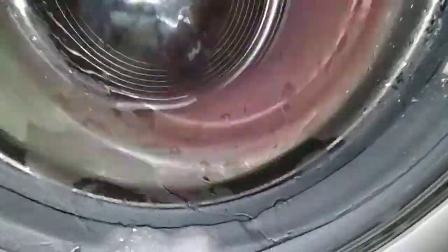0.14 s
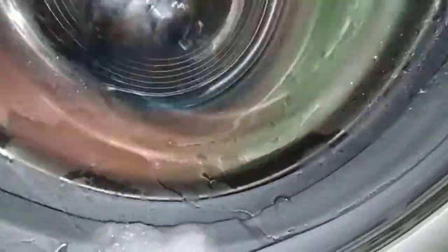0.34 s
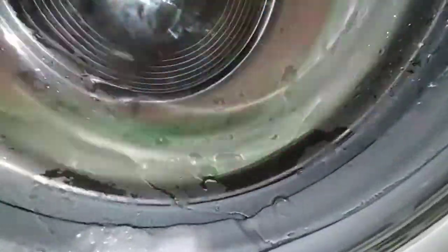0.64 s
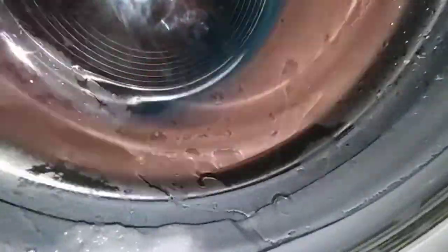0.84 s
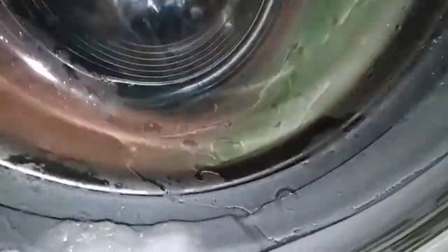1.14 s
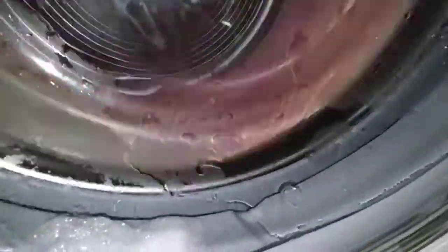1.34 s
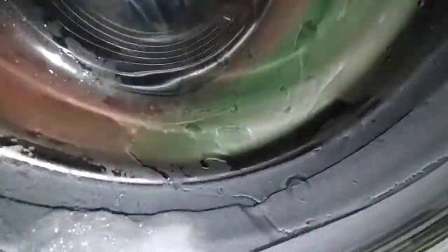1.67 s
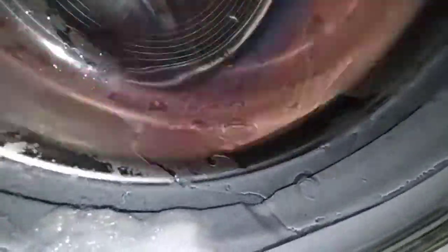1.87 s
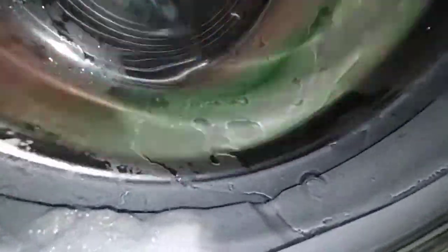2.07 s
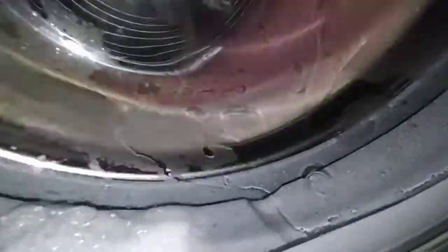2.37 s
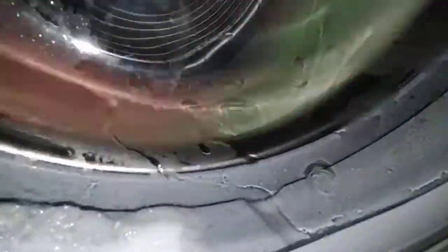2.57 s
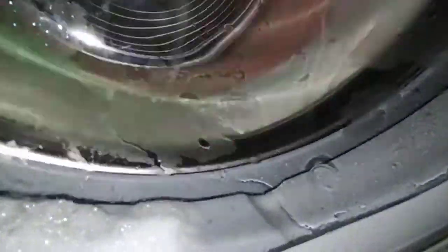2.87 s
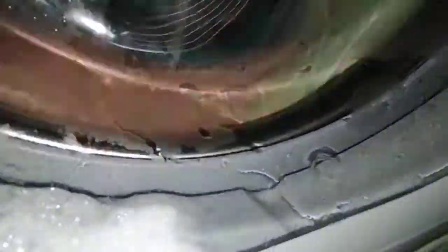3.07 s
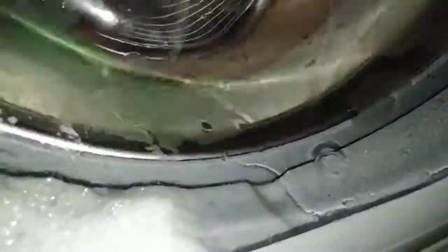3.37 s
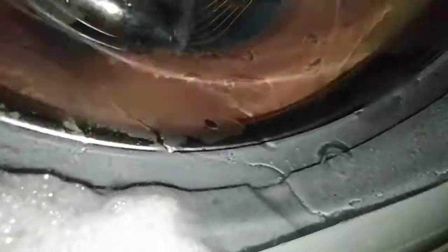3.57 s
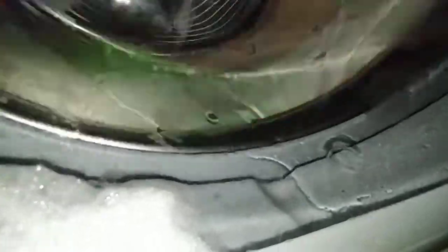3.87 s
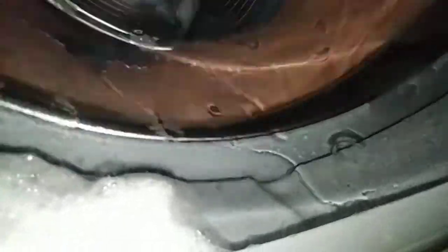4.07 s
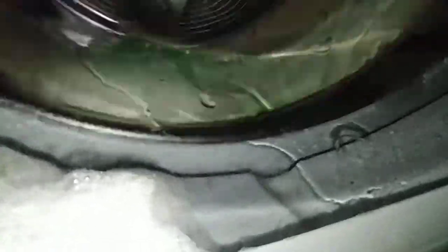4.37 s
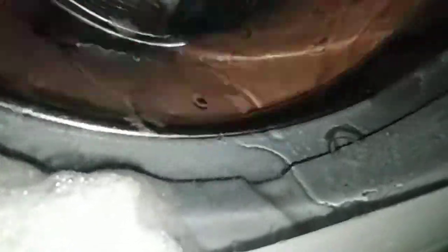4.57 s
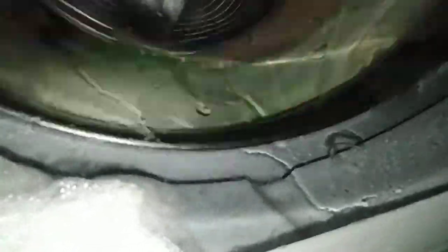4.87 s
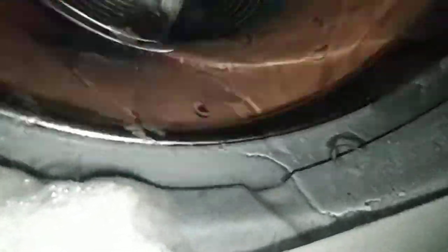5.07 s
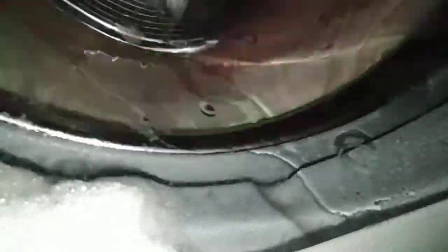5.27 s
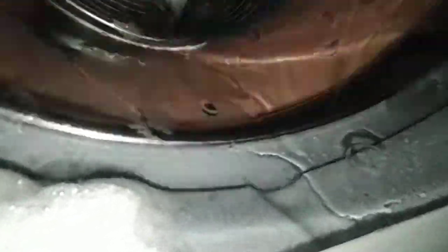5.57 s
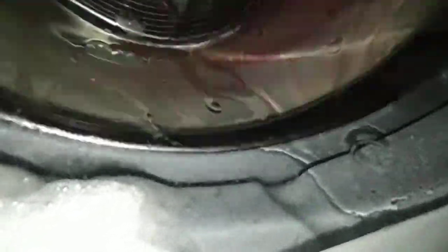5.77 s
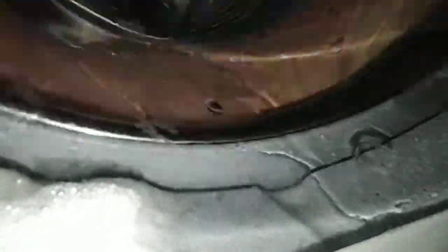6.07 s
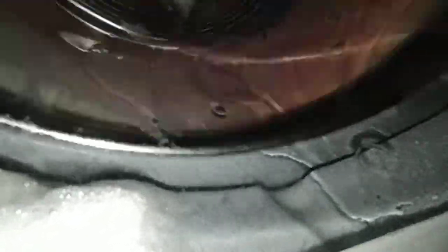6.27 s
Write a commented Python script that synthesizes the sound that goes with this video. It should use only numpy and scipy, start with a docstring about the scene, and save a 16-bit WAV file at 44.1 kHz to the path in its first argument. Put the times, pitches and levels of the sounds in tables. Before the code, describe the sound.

Close to a spinning washer: a strong low whine slowly rises and throbs, the drum rumbles and cabinet buzzes, faint water hisses, and a brief skip ticks.

```python
"""Washing machine gathering spin speed

Beside a front-loading washing machine, close to the door, in left and right microphone channels.
The direct-drive motor whines at 36 times the drum rate, throbs once a turn and beats ever more slowly
against the mains hum. The wet load rumbles in the tub and shakes the cabinet; filtered noise makes
the water hissing off the drum and the inverter singing very high. Midway the sound skips with a tick."""
import sys
import numpy as np
from scipy import signal
from scipy.fft import rfft, irfft
from scipy.io import wavfile
from scipy.ndimage import uniform_filter1d

SR = 44100
rng = np.random.default_rng(int(sys.argv[2]) if len(sys.argv) > 2 else 0)


def file_out(sig):
    """Save sig as 16-bit WAV at sys.argv[1]."""
    # one column per channel
    cols = np.atleast_2d(sig).T
    # limit, then scale
    lim = np.clip(cols, -1, 1)
    pcm = np.round(lim * 32767).astype(np.int16)
    wavfile.write(sys.argv[1], SR, pcm)


N = 283122
T = np.arange(N) / SR   # seconds
HZ = np.maximum(np.arange(N // 2 + 1) * SR / N, 1)   # spectrum axis
SIDES = np.array([[.5], [-.5]])   # half of a difference goes to the left, half to the right

# drum speed: time_s, turns_per_s
DRUM_SPEED = [(0, 7.4377), (3.561, 7.8605), (6.42, 8.2008)]
MOTOR_POLES, START_TURN, MAINS_HZ = 36, .002, 50.068
SKIP_AT_S, SKIP_S = 3.561, .02   # when the sound skips, and how much is lost

# motor whine: time_s, level_db
WHINE = [(0, -31), (.25, -28), (.95, -20), (1.8, -21), (2.6, -23.5), (3.55, -29), (4.1, -24.5),
         (4.6, -24.5), (5.6, -29.5), (5.85, -31), (6.05, -32.5), (6.42, -29.5)]
# octave of the whine, which all but vanishes midway and then sings out: time_s, level_db
OCTAVE = [(0, -63), (.5, -57.5), (1.3, -62), (2.3, -55), (2.6, -70.5), (3.2, -70), (3.9, -49.5),
          (4.45, -55), (5.0, -51.5), (5.4, -54.5), (6.42, -54.5)]
OCTAVE_WAVER_DB, OCTAVE_WAVER_PER_S = -0.3, 6   # the octave is slightly unsteady
# once-a-turn swings of the whine: time_s, throb_in_level_db, sway_in_pitch_db
THROB = [(0, -41, -43), (.5, -51, -35), (1.4, -39.5, -39), (2.2, -33.5, -40), (3.0, -33.5, -34.5),
         (3.6, -46, -32.5), (4.2, -44, -33.5), (5.0, -41.5, -41), (5.35, -37, -43), (5.7, -34, -51),
         (5.92, -33.5, -42), (6.08, -40, -42), (6.42, -37.5, -41)]
# place of the whine between the channels: time_s, left_minus_right_db, left_lead_radians
WHINE_SIDE = [(0, 1.8, -.09), (.6, 0.75, 0.042), (1.5, 0, 0.15), (2.8, -2, 0.22), (3.65, -0.5, 0.34),
              (4.2, -1, 0.15), (5.3, -1.3, 0.34), (6.05, 2.5, 0.28), (6.42, 3.5, -0.27)]
# the throb falls earlier in the turn as the drum speeds up: lead at the start, and what is added by the end
THROB_LEAD_TURNS, THROB_LEAD_GROWTH_TURNS = 0.12, 0.59

# the wet load rolling in the tub: level, unevenness, changes per s
LOAD_DB, LOAD_WAVER_DB, LOAD_WAVER_PER_S = -45, 2.5, 17
LOAD_START_DB, LOAD_BUILD_S = -2.5, .9   # softer start: shortfall, time constant
# lumps of the load thudding: time_s, level_db
THUDS = [(1.27, -35), (2.19, -38.5), (2.46, -37), (2.66, -43), (2.87, -36), (3.09, -40.5), (3.27, -36),
         (4.35, -39), (4.63, -38), (4.99, -36.5), (5.24, -40.5), (5.55, -41.5), (5.94, -39), (6.12, -40.5)]
THUD_SWELL_S = 0.038   # time for the tub's boom to build, and to die

# the two strongest drum vibrations: multiples of the drum rate
SHAKE_ORDERS = (7, 11)
# these two swell and fade as the tub speeds up: time_s, lower_tone_db, upper_tone_db
SHAKE = [(0, -42.5, -50), (.5, -40, -55), (.9, -45.5, -51), (1.15, -40, -51), (2.0, -38, -46),
         (2.35, -41.5, -47), (2.7, -37.5, -42.5), (3.2, -37, -41.5), (4.2, -39.5, -43), (4.5, -42, -43.5),
         (5.15, -41.5, -45.5), (5.45, -40.3, -54), (6.42, -42, -49)]
# weaker drum vibrations: multiples of the drum rate
WEAK_ORDERS = (1, 3, 5, 8, 9, 10, 13, 14)
# their levels: level_db
WEAK_ORDER_DB = (-58, -60, -56.5, -57, -54, -62, -60.5, -60.5)

# resonances, all as: centre_hz, width_hz (distance from centre to -12 dB), relative_level_db
TUB_MODES = [(129, 20, -4), (136.6, 12, 3)]
CABINET_MODES = [(98.74, 12, -13), (149.2, 2.3, -4), (164.8, 11, 0), (183, 5, 1.5), (191.2, 9, 2),
                 (220.3, 1.9, 5), (249, 26, -7), (282, 63, -7.5), (312, 50, -8.5)]
PANEL_MODES = [(395.3, 38, -0.5), (448, 15.3, 2), (508.4, 25, -2), (545.6, 9.6, -1), (574, 17, -5.5),
               (636, 180, -15)]
DOOR_MODES = [(778, 91, -6.5), (847.4, 21, 2.5), (873, 110, -4.5), (938, 82, -8.5)]
DRUM_MODES = [(1018, 94, -1), (1174, 220, -7), (1248, 197, -1.5), (1563, 270, -10)]
SEAL_MODES = [(2490, 370, 3.5), (3040, 1000, -3.5)]
FILM_MODES = [(6140, 2200, 0)]
INVERTER_MODES = [(14095, 40, -11), (14678, 35, 8.5), (14800, 240, 1), (14900, 1300, -7), (15440, 40, -4.5)]

CABINET_DB, CABINET_RISE_DB = -41, 0.5   # buzz at the slowest speed; its gain by the fastest
# panels and door rattling in spells: time_s, panel_buzz_db, door_buzz_db
RATTLE = [(0, -46.5, -51), (.75, -49, -53.5), (1.25, -47.5, -55), (1.7, -47, -51), (2.6, -45.5, -50),
          (3.65, -45, -51.5), (4.1, -45.5, -48), (6.42, -45, -48.5)]
RING_DB = -51.5   # ring of the steel drum
# dull wash, spectrum: pitch_hz, relative_level_db_per_hz
FLOOR = [(12, 0), (25, 1.5), (60, 8), (110, -5), (350, -6), (700, -15.5), (1500, -38)]
FLOOR_DB, FLOOR_RISE_DB = -54, 0.5   # level at the slowest speed; its gain by the fastest

# water rushing round the tub: time_s, level_db
RUSH = [(0, -55), (1.2, -56), (2.8, -56.5), (4.6, -55.5), (6.42, -55)]
# spectrum of the rush: pitch_hz, relative_level_db_per_hz
WATER = [(1000, -9), (1500, 2.5), (1900, 1.5), (2400, 1), (2750, -1), (3200, -7), (4000, -8), (5000, -13.5),
         (6500, -19.5), (9000, -29), (13000, -39.5)]
# spectrum of the fine spray: pitch_hz, relative_level_db_per_hz
SPRAY = [(4000, -23), (6000, -4.5), (7500, 1), (9000, 3.5), (9900, -1), (10800, -11), (13000, -20),
         (14000, -23.5)]
# spray and inverter build up as the motor takes the strain: full level, shortfall at the start, time constant
SPRAY_DB, SPRAY_START_DB, SPRAY_BUILD_S = -62.5, -4.5, 2.1
INVERTER_DB, INVERTER_START_DB, INVERTER_BUILD_S = -67.5, -6.5, 1.3
# water gathers and hisses at the door seal, then drains away
SEAL_DB, SEAL_START_DB, SEAL_BUILD_S = -59, -0.5, .7
DRAIN_AT_S, DRAIN_DB_PER_S = 2.64, 8.5
FILM_DB, FILM_AT_S, FILM_SPREAD_S = -67, 0.36, 0.21   # a film spreads over the glass
# drops and spurts on the door glass: start_s, level_db, centre_hz, width_hz, length_s
SPURTS = [(0.46, -44, 1000, 2600, .011), (0.478, -55, 3500, 8000, 0.013), (0.664, -60.5, 8550, 1400, 0.058),
          (0.723, -65, 5500, 1600, .035), (1.28, -65, 4500, 5000, 0.018), (1.33, -59, 3500, 1600, .025),
          (1.944, -54, 2400, 500, 0.038), (2.39, -57.5, 9050, 1000, 0.027), (2.456, -61, 4260, 2600, .035),
          (2.647, -55.5, 8340, 1800, 0.06), (2.987, -58, 3000, 3000, 0.015), (4.07, -64, 7800, 2400, .11),
          (4.777, -64, 3800, 600, 0.052)]

# mains hum: multiples of the mains frequency
HUM_MULTIPLES = (2, 3, 4, 6, 7, 8, 9, 10, 11, 17)
# one row for each multiple: level_db, left_minus_right_db, left_lead_radians
HUM = [(-57, -3.5, 0.66), (-60, 4, 0), (-54, -2, 0.53), (-39, -0.3, .06), (-59.5, 2.5, -.5), (-57.5, 0, .2),
       (-57.5, -2.5, 0.12), (-62.5, -2.5, 2.1), (-65, -6, 0.34), (-70, 1, -.3)]
HUM_RISE_DB = 0.9   # the hum grows as the motor draws more current
STEADY_HUM_UP_TO = 6   # higher multiples come through the shaking panels and waver
HUM_WAVER_DB, HUM_WAVER_PER_S = 2.5, 7.6

# likeness of the two channels for noise: pitch_hz, left_right_likeness (1 alike, -1 opposite)
LIKENESS = [(60, 0.81), (130, 1), (250, 0.88), (340, 0.93), (395, 1), (435, .93), (485, 0.61), (540, 0.46),
            (650, .13), (790, 0.22), (850, 0.5), (930, .08), (1030, 0.098), (1120, -0.13), (1300, -0.5),
            (1550, -0.31), (1800, -0.18), (2300, -0.013), (4000, -0.02)]
# lean of everything but whine, hum and tick: pitch_hz, left_minus_right_db
TILT = [(140, 0.5), (300, 2.5), (500, -4), (800, 3), (1170, -1), (1790, 1.5), (2740, 4), (6400, 4.5),
        (9300, -2.5), (12000, -2), (14700, 5)]
CUTOFF_HZ = 15600


def motor(turn, pace, oval_low_db, oval_high_db, paddle_db):
    """The off-centre load moves the rotor once a turn: the whine throbs in level and sways in pitch."""
    tone_db, = in_time(WHINE)
    octave_db, = in_time(OCTAVE)
    throb_db, sway_db = in_time(THROB)
    pan_db, lead = in_time(WHINE_SIDE)
    poles = MOTOR_POLES * turn + SIDES * lead / (2 * np.pi)
    throb_lead = THROB_LEAD_TURNS + THROB_LEAD_GROWTH_TURNS * np.sqrt(pace)
    throb = from_db(throb_db) * np.cos(2 * np.pi * (turn + throb_lead))
    strength = from_db(tone_db) + throb
    # a tone a quarter cycle off the whine pulls its phase, and so its pitch
    sway = from_db(sway_db) * np.cos(2 * np.pi * turn)
    whine = strength * wave(poles) + sway * np.sqrt(2) * np.sin(2 * np.pi * poles)
    octave_gain = from_db(octave_db) * waver(OCTAVE_WAVER_DB, OCTAVE_WAVER_PER_S)
    octave = octave_gain * wave(2 * poles)
    # an oval load and the three paddles add side tones, two and three drum rates away
    oval_low = from_db(oval_low_db) * wave(poles - 2 * turn)
    oval_high = from_db(oval_high_db) * wave(poles + 2 * turn)
    paddles = from_db(paddle_db) * wave(poles + 3 * turn)
    return from_db(SIDES * pan_db) * (whine + octave + paddles - oval_low - oval_high)


def load(turn):
    """The wet load rolls over once a turn and now and then thuds, and the tub booms with it."""
    rolling = build_up(LOAD_DB, LOAD_START_DB, LOAD_BUILD_S) * waver(LOAD_WAVER_DB, LOAD_WAVER_PER_S)
    rolling = rolling * pulsing(turn, depth_db=1.2, lead_turns=.47)
    thuds = sum(from_db(db) * np.exp(-((T - s) / THUD_SWELL_S) ** 2) for s, db in THUDS)
    boom = evened(noise(resonances(TUB_MODES)), size=2500)
    return np.hypot(rolling, thuds) * boom


def drum(turn):
    """Bearings and paddles shake the tub at whole multiples of the drum rate; two stand out, deep and clean."""
    gains = dict(zip(WEAK_ORDERS, from_db(WEAK_ORDER_DB)))
    gains.update(zip(SHAKE_ORDERS, from_db(in_time(SHAKE))))
    return sum(gain * wave(k * turn + rng.random()) for k, gain in gains.items())


def cabinet(turn, speed, pace):
    """The shaking tub sets the cabinet buzzing, harder once a turn and as the speed rises."""
    hum_and_noise = evened(buzz(CABINET_MODES, turn, speed, regular_db=-1.0), size=9000)
    level = from_db(CABINET_DB + CABINET_RISE_DB * pace)
    return level * hum_and_noise * pulsing(turn, depth_db=0.4, lead_turns=0.52)


def panels_and_door(turn, speed):
    """The shaking tub rattles panels and door in spells: resonant noise that pulses once a turn."""
    panel_db, door_db = in_time(RATTLE)
    panels = from_db(panel_db) * evened(noise(resonances(PANEL_MODES)), size=7000)
    panels = panels * pulsing(turn, depth_db=0.6, lead_turns=0.12)
    door = from_db(door_db) * buzz(DOOR_MODES, turn, speed, regular_db=-10.0)
    door = door * pulsing(turn, depth_db=0.5, lead_turns=.48) * waver(depth_db=0.66, per_s=7.1)
    return panels + door


def drum_ring(turn):
    """The steel drum rings: resonant noise, rippled by short echoes and fluttering with the turns."""
    ripple = echoes(strength=0.13, longest_s=.04, count=6)
    ring = noise(resonances(DRUM_MODES) * ripple)
    return from_db(RING_DB) * ring * flutter(turn, depth_db=1.0, count=3)


def rush_and_spray(turn):
    """Water flung from the drum rushes round the tub under a fine spray: noise with a rippled spectrum."""
    ripple = echoes(strength=0.16, longest_s=.02, count=8)
    rush_db, = in_time(RUSH)
    rush = from_db(rush_db) * noise(from_db(over_hz(WATER)) * ripple)
    rush = rush * flutter(turn, depth_db=0.86, count=4)
    spray_level = build_up(SPRAY_DB, SPRAY_START_DB, SPRAY_BUILD_S)
    return rush + spray_level * noise(from_db(over_hz(SPRAY)) * ripple)


def seal_and_film():
    """Water sputters at the door seal and on the glass as wavering noise, fading once it drains."""
    wet = from_db(-DRAIN_DB_PER_S * np.maximum(T - DRAIN_AT_S, 0))
    seal = build_up(SEAL_DB, SEAL_START_DB, SEAL_BUILD_S) * noise(resonances(SEAL_MODES))
    seal = seal * waver(depth_db=1.5, per_s=14)
    spread = np.clip((T - FILM_AT_S) / FILM_SPREAD_S, 0, 1)
    film = from_db(FILM_DB) * spread * noise(resonances(FILM_MODES)) * waver(depth_db=1.0, per_s=14)
    return wet * (seal + film)


def spurts():
    """Each spurt is a band of noise that swells quickly and hisses away."""
    out = 0
    for s, db, hz, width, length in SPURTS:
        age = np.maximum(T - s, 0) / (length / 3)   # loudest at age 1
        out = out + from_db(db) * age * np.exp(1 - age) * noise(resonances([(hz, width, 0)]))
    return out


def inverter():
    """The motor's drive sings very high, as narrow bands of noise."""
    return build_up(INVERTER_DB, INVERTER_START_DB, INVERTER_BUILD_S) * noise(resonances(INVERTER_MODES))


def hum(clock, pace):
    """Mains harmonics; the sixth lies just above the whine and beats with it, and those above it waver."""
    out = 0
    for k, (db, pan_db, lead) in zip(HUM_MULTIPLES, HUM):
        unsteady = waver(HUM_WAVER_DB, HUM_WAVER_PER_S) if k > STEADY_HUM_UP_TO else 1
        tone = wave(k * MAINS_HZ * clock + SIDES * lead / (2 * np.pi))
        out = out + unsteady * from_db(db + SIDES * pan_db) * tone
    return from_db(HUM_RISE_DB * pace) * out


def dull_wash(pace):
    """A dull wash of low noise lies underneath and gains with speed."""
    return from_db(FLOOR_DB + FLOOR_RISE_DB * pace) * noise(from_db(over_hz(FLOOR)))


def skip_tick(db, length_s, knock_db, knock_hz, knock_s):
    """A sharp edge and a dull knock, both dying exponentially, where the sound skips."""
    age = np.maximum(T - SKIP_AT_S, 0)
    edge = from_db(db) * (age > 0) * np.exp(-age / length_s)
    knock = from_db(knock_db) * np.sin(2 * np.pi * knock_hz * age) * np.exp(-age / knock_s)
    return knock - edge


def buzz(modes, turn, speed, regular_db):
    """A shaken part: drum harmonics that swell as they glide through the modes, mixed with noise."""
    gain = resonances(modes)
    lowest, highest = int(modes[0][0] / speed.max()), int(modes[-1][0] / speed.min())
    regular = sum(np.interp(k * speed, HZ, gain) * wave(k * turn + rng.random())
                  for k in range(lowest, highest + 1))
    share = from_db(regular_db)   # regular part relative to the noise
    return (noise(gain) + share * rms_one(regular)) / np.hypot(1, share)


def noise(gain):
    """Stereo noise of a given colour and left-right likeness; its middle has unit power."""
    mid, side = rfft(rng.standard_normal((2, N))) * gain
    alike = np.clip(over_hz(LIKENESS), -.99, .995)
    mid = irfft(mid * np.sqrt(1 + alike), N)
    side = irfft(side * np.sqrt(1 - alike), N)
    return np.array([mid + side, mid - side]) / np.std(mid)


def resonances(modes):
    """Gain of a set of steep-sided resonances, added in power."""
    return np.sqrt(sum(from_db(2 * db) / (1 + ((HZ - hz) / width) ** 2) ** 4 for hz, width, db in modes))


def echoes(strength, longest_s, count):
    """Short reflections inside the tub ripple a spectrum finely."""
    delays = rng.uniform(0.0992 * longest_s, longest_s, count)
    return np.abs(1 + strength * sum(np.exp(-2j * np.pi * HZ * delay) for delay in delays))


def evened(x, size):
    """Take the slow swells out of a noise, over a window of size samples."""
    return x / np.sqrt(uniform_filter1d(np.mean(x, axis=0) ** 2, size) + 1e-9)


def flutter(turn, depth_db, count):
    """Gain that rises and falls as the lumps of the load come round."""
    lumps = sum(wave(k * turn + rng.random()) for k in range(1, count + 1))
    return from_db(depth_db * rms_one(lumps))


def pulsing(turn, depth_db, lead_turns):
    """Gain that pulses once a turn, in step with the drum."""
    return from_db(depth_db * np.cos(2 * np.pi * (turn + lead_turns)))


def waver(depth_db, per_s):
    """Gain that wanders at random."""
    slow = irfft(rfft(rng.standard_normal(N)) / (1 + (HZ / per_s) ** 4), N)
    return from_db(depth_db * rms_one(slow))


def build_up(full_db, start_db, build_s):
    """Gain that starts low and settles towards its full level."""
    return from_db(full_db + start_db * np.exp(-T / build_s))


def wave(cycles):
    """A unit-power tone that follows a count of cycles."""
    return -np.sqrt(2) * np.cos(2 * np.pi * cycles)


def in_time(rows):
    """One curve per column, joined by straight lines."""
    s, *columns = np.transpose(rows)
    return [np.interp(T, s, c) for c in columns]


def over_hz(points):
    """A short table spread over the log-frequency axis."""
    hz, value = np.transpose(points)
    return np.interp(np.log(HZ), np.log(hz), value)


def rms_one(x):
    """Scale to unit power."""
    return x / np.sqrt(np.mean(x ** 2) + 1e-20)


def from_db(db):
    """Decibels to gain."""
    return 10 ** (np.asarray(db) / 20)


def scene():
    """Motor and shaken parts follow the drum angle; all but whine, hum and tick lean sideways by band."""
    clock = T + SKIP_S * (T > SKIP_AT_S)   # drum and hum jump ahead at the skip
    speed, = in_time(DRUM_SPEED)
    pace = (speed - speed.min()) / np.ptp(speed)   # 0 at the slowest, 1 at the fastest
    turn = START_TURN + np.cumsum(speed * np.diff(clock, prepend=0))
    whine = motor(turn, pace, oval_low_db=-50.5, oval_high_db=-62, paddle_db=-48.0)
    shaking = load(turn) + drum(turn) + cabinet(turn, speed, pace)
    shaking = shaking + panels_and_door(turn, speed) + drum_ring(turn)
    water = rush_and_spray(turn) + seal_and_film() + spurts()
    machine = shaking + water + inverter() + dull_wash(pace)
    leaning = irfft(rfft(machine) * from_db(SIDES * over_hz(TILT)), N)
    tick = skip_tick(db=-28.5, length_s=.003, knock_db=-27.0, knock_hz=192, knock_s=0.0087)
    return whine + leaning + hum(clock, pace) + tick


def record(dry):
    """A steep elliptic low-pass cuts off the top."""
    return signal.sosfilt(signal.ellip(10, .1, 90, CUTOFF_HZ, fs=SR, output="sos"), dry)


dry = scene()
out = record(dry)
file_out(out)
```